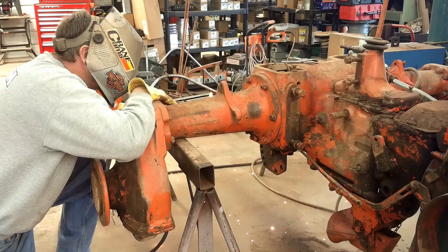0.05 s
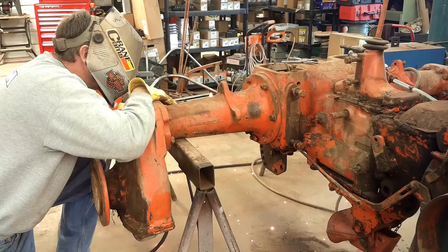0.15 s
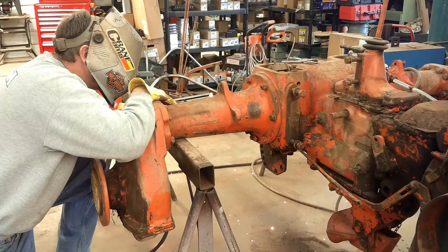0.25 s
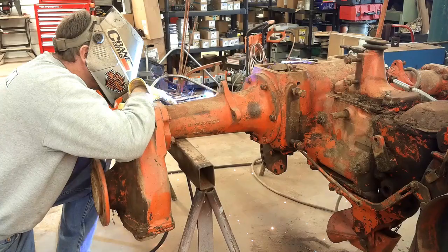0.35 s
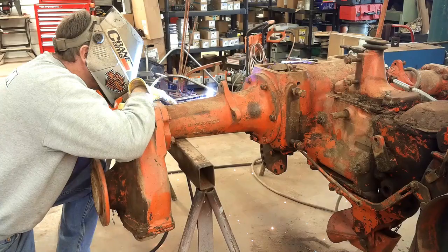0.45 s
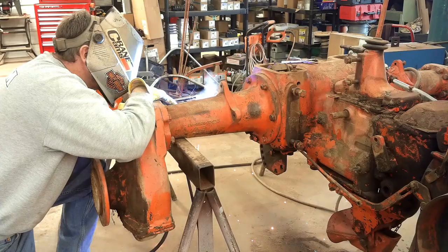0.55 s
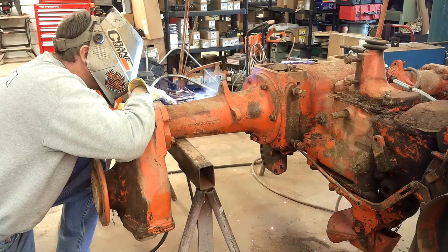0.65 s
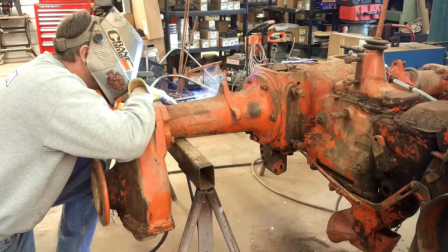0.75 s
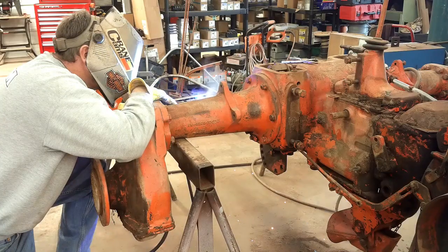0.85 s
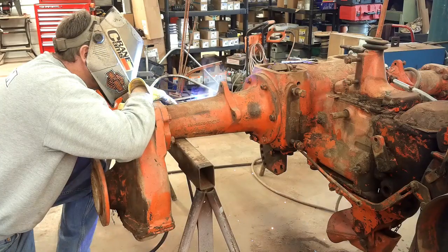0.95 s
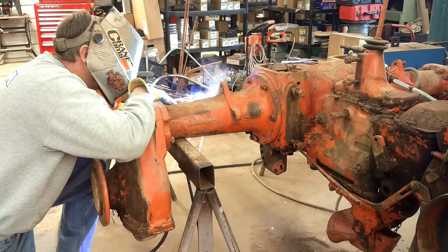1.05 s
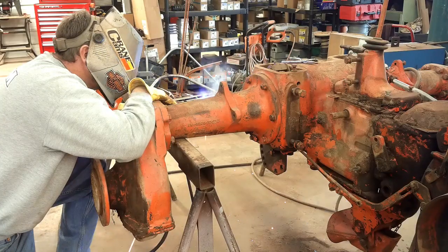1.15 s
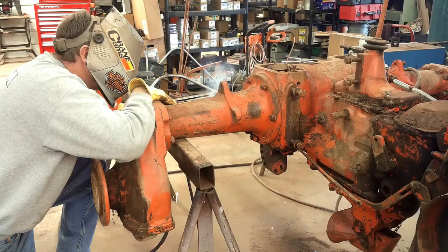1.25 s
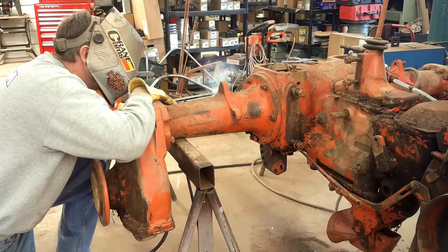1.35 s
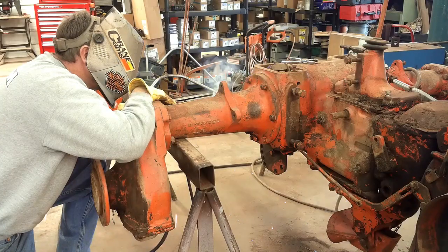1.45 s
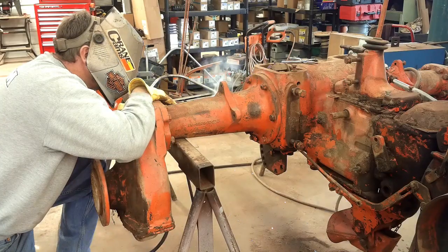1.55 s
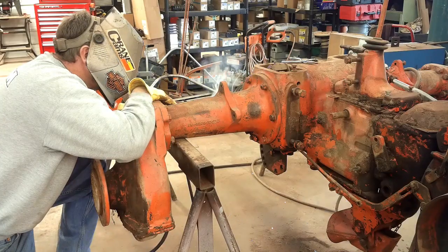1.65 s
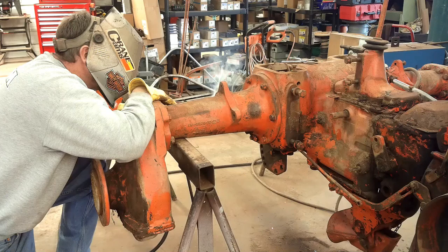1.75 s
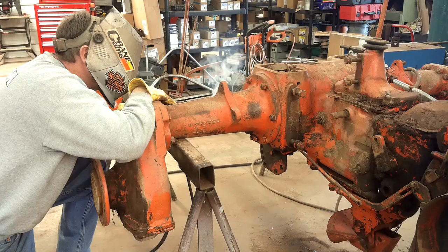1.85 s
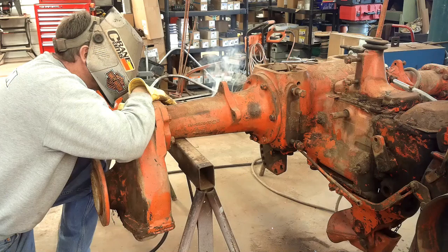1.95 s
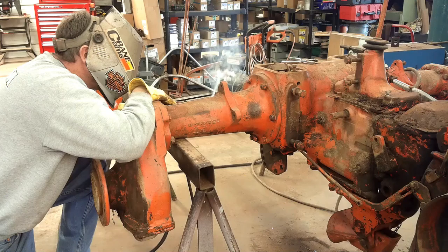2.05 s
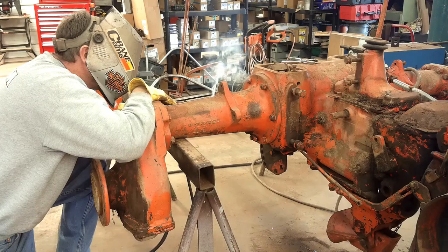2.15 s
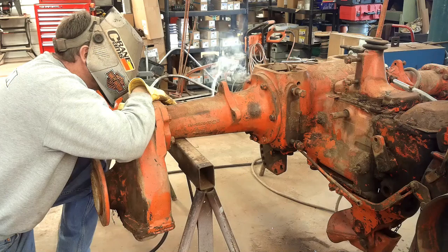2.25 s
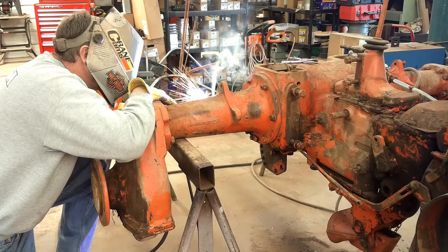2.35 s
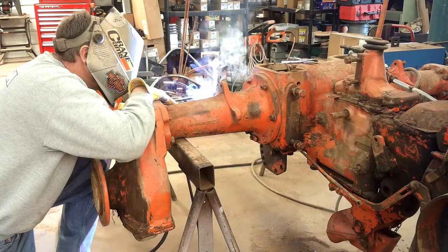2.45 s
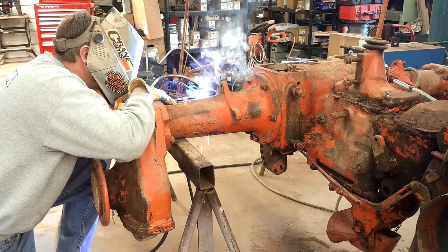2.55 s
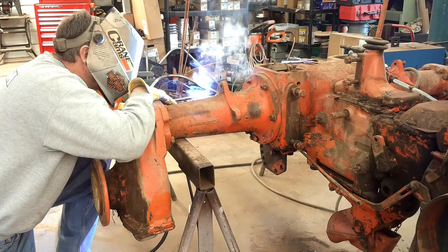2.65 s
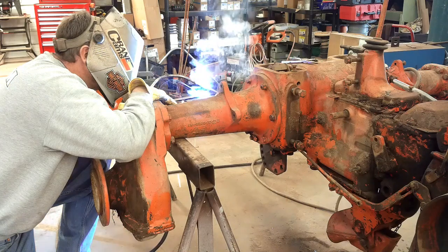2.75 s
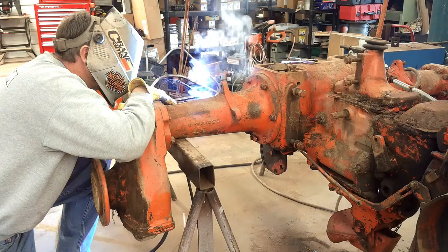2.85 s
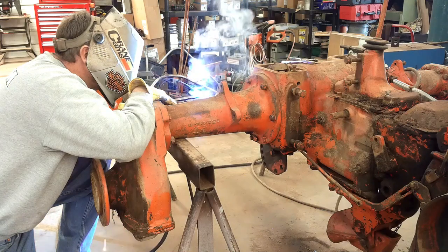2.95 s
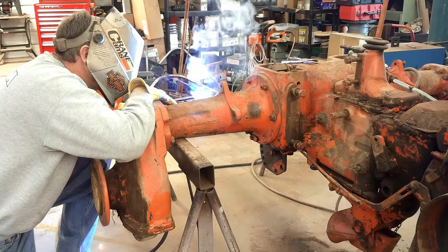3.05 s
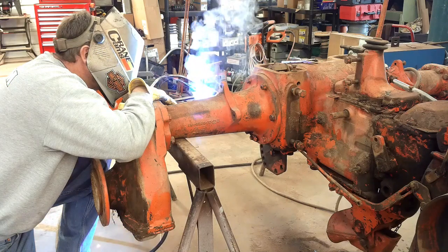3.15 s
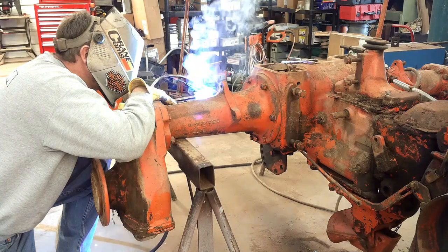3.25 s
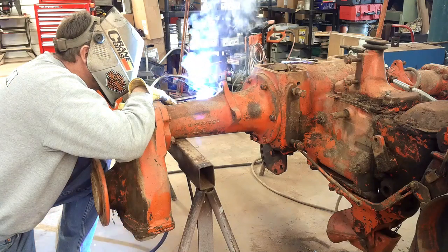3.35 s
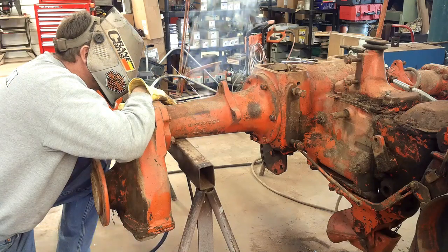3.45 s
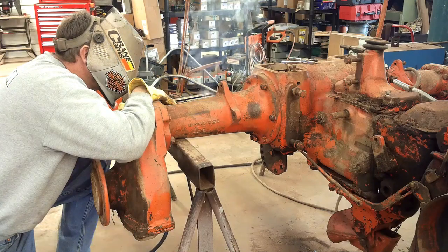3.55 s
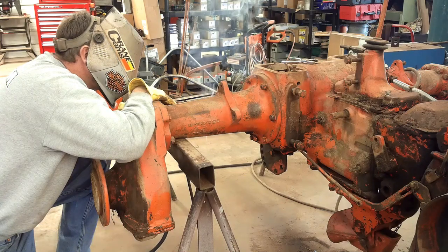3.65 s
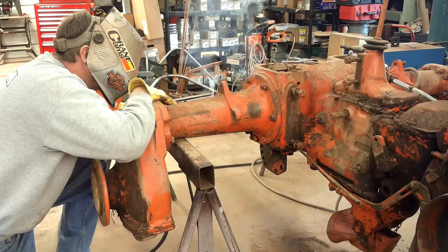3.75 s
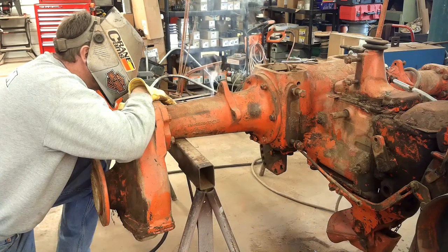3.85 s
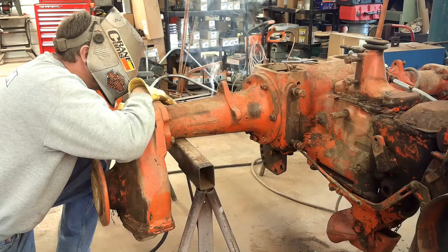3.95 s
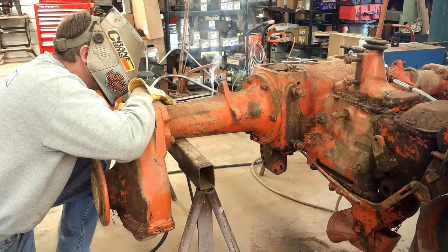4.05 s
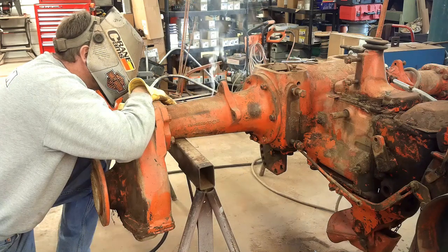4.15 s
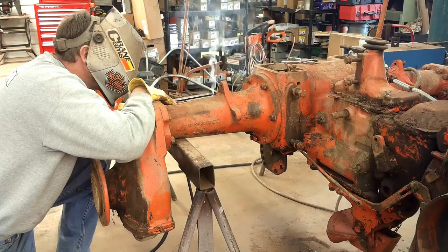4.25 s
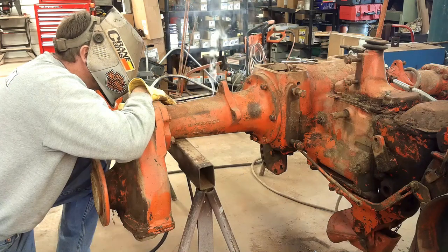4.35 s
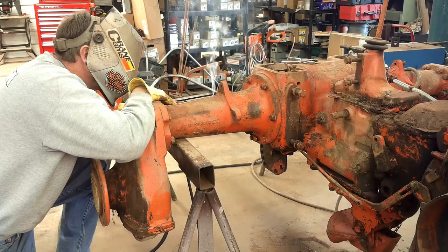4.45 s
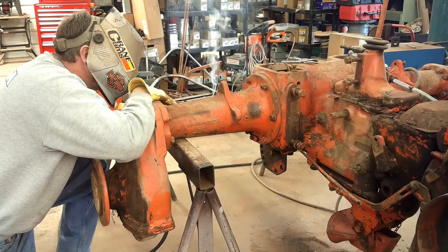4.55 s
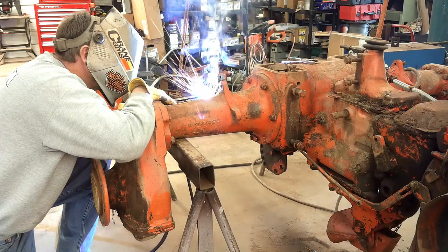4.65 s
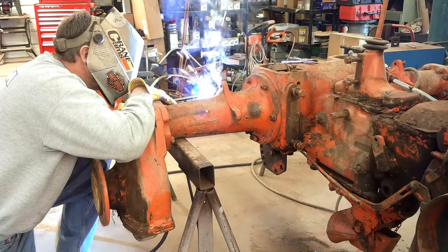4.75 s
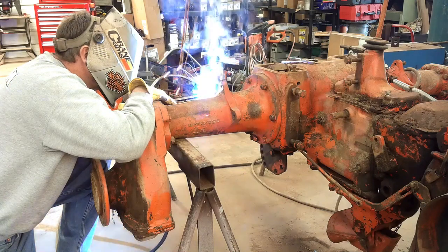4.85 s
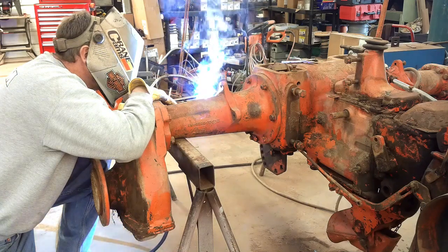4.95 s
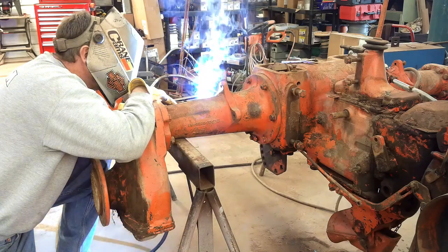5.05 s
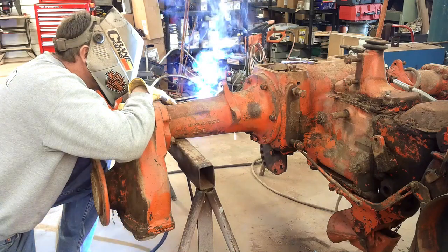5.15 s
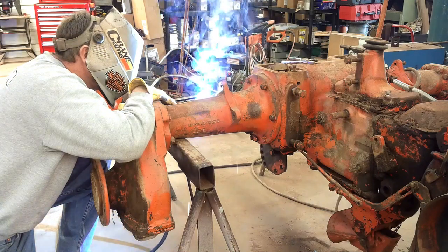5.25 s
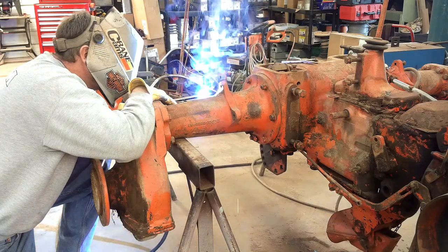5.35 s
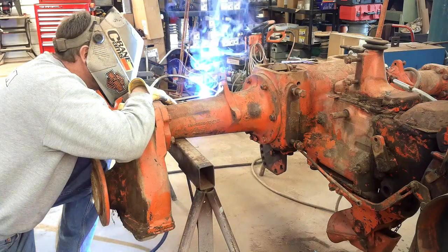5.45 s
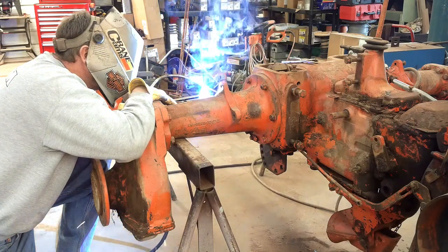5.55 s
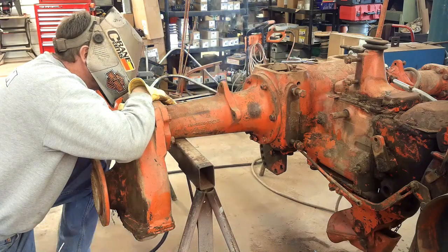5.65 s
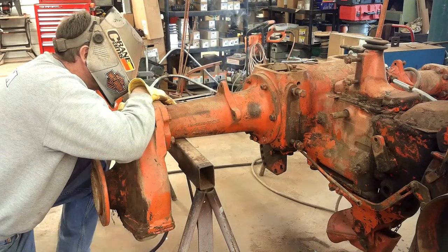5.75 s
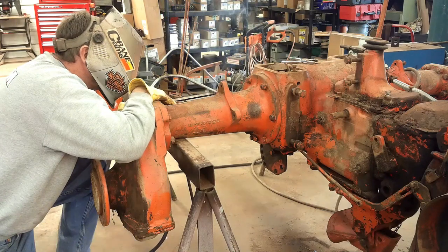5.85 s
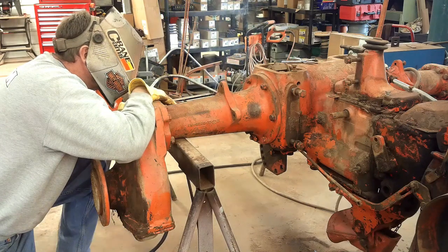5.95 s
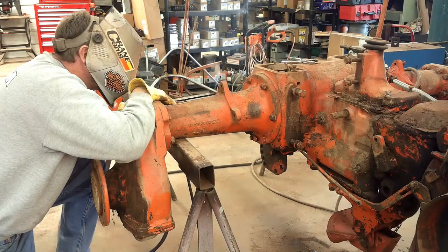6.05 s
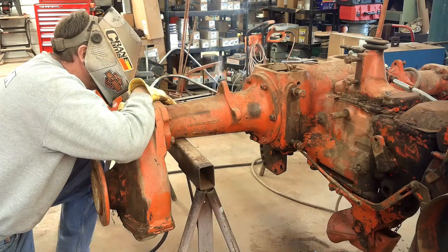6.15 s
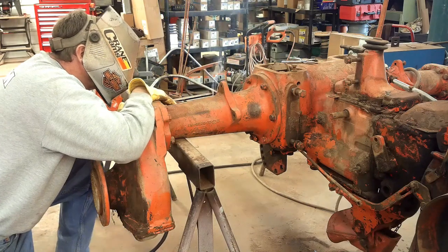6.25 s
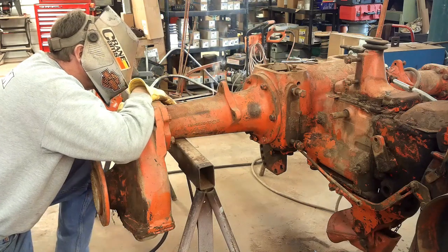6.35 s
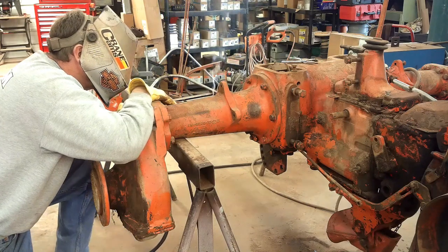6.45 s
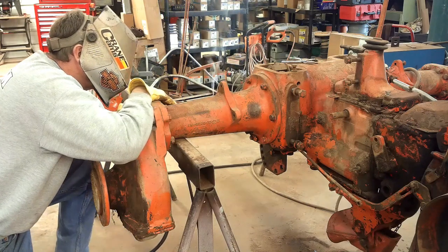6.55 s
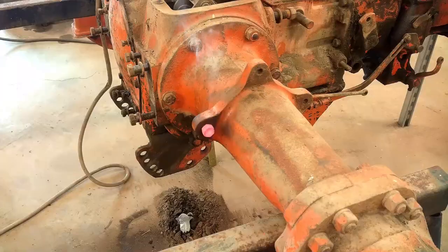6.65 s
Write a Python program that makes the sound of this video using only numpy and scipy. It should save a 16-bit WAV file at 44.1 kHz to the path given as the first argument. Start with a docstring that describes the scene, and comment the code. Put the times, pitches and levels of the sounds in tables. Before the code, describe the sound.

In a workshop, an arc welder strikes on rusty steel with a scratch and low thump, spitting coarse crackles and loud pops for nearly a second. After a pause with faint transformer hum, two more one-second welds settle into buzzing, frying sizzle with a thin whistle. Each ends in a short gas puff with metal ringing. Close microphone, hard echoes, loudest pops slightly overloaded.

```python
"""Three short arc welds

A nut is welded to a rusted bolt on a tractor axle, in a workshop. Each weld starts with a scratch and a thump
and ends with a puff of gas. The first spits on the rust; the others settle into a frying sizzle, pulsing with
the mains, and a thin whistle. Spatter and sizzle are random sparks, pops are filtered clicks, gas is shaped
noise; the steel rings as resonators, and the transformer hum, heard in between, is a set of sines."""
import sys
import numpy as np
from scipy import signal
from scipy.fft import rfft, irfft
from scipy.io import wavfile
from scipy.ndimage import uniform_filter1d

SR = 44100
rng = np.random.default_rng(int(sys.argv[2]) if len(sys.argv) > 2 else 0)


def generate_wav(sig):
    """Save sig (samples, or channels by samples) to the path in sys.argv[1] as 16-bit PCM at SR."""
    pcm = np.round(np.clip(np.atleast_2d(sig).T, -1, 1) * 32767).astype(np.int16)
    wavfile.write(sys.argv[1], SR, pcm)


N = 295602
TIME = np.arange(N) / SR
MAINS_HZ = 60


def from_db(db):
    """Decibels to gain."""
    return 10 ** (np.asarray(db) / 20)


def rms_one(x):
    """Scale to an rms of one."""
    return x / np.sqrt(np.mean(x ** 2) + 1e-20)


def at_hz(points, hz):
    """Interpolate a table on a log-frequency axis."""
    known_hz, values = np.transpose(points)
    return np.interp(np.log(hz + 1), np.log(known_hz), values)


def colour(x, spectrum):
    """Minimum-phase filter with the given spectrum shape; white noise keeps its level."""
    size = 8192
    gain = rms_one(from_db(at_hz(spectrum, np.fft.rfftfreq(size, 1 / SR))))
    # fold the cepstrum to make the response causal
    cepstrum = irfft(np.log(gain))[:size // 2]
    cepstrum[1:] *= 2
    response = irfft(np.exp(rfft(cepstrum, size)))
    return signal.fftconvolve(x, response)[:N]


def resonate(x, hz, width_hz):
    """Two-pole resonance, gain one at its top."""
    r = np.exp(-np.pi * width_hz / SR)
    zeros = np.array([1, 0, -1]) * (1 - r * r) / 2
    poles = [1, -2 * r * np.cos(2 * np.pi * hz / SR), r * r]
    return signal.lfilter(zeros, poles, x + 1e-18)


def flicker(per_s):
    """Smooth random curve, rms one."""
    return rms_one(np.interp(TIME * per_s, np.arange(N), rng.standard_normal(N)))


def sparks(per_s, spread_db):
    """Tiny discharges at random moments, a few much larger than the rest; rms one."""
    sizes = from_db(spread_db * np.minimum(rng.exponential(1, N), 4))
    signs = rng.choice([-1, 1], N)
    return rms_one(sizes * signs * (rng.random(N) < per_s / SR))


def swell(start, rise_s, t60):
    """Envelope: linear rise times exponential decay."""
    age = np.maximum(TIME - start, 0)
    return np.minimum(age / rise_s, 1) * np.exp(-np.log(1000) * age / t60)


# welds: arc lights t/s, arc out t/s, fade/s, settled crackle level/dB, extra level while fresh/dB,
# spatter share of power [0-1], lift of odd hum lines/dB
WELDS = [(0.443, 1.327, 0.12, -18.5, -2, 0.94, 0.5), (2.434, 3.508, 0.016, -25, 6.5, 0.34, 16.5),
         (4.732, 5.703, 0.015, -24.5, 6, 0.07, 13.5)]
# relative spectra of coarse spatter and fine sizzle: f/Hz, level/dB
SPATTER_SPECTRUM = [(88, -47.5), (150, -24), (225, -36), (290, -24.5), (381, -22.5), (694, -9.5),
                    (1170, -12.5), (1630, -7.5), (2650, -3.5), (3900, 0), (6340, -6.5), (9530, -4),
                    (15500, -30.5)]
SIZZLE_SPECTRUM = [(150, -25.5), (400, -14), (900, -6), (2300, -3.5), (3100, -1.5), (3900, -1),
                   (5400, -4.5), (6400, -14.5), (7900, -6), (9700, -13), (11000, -23.5), (12000, -20.5),
                   (13200, -11), (15500, -26.5)]
LIGHT_S, SETTLE_S = 0.012, 0.23   # build-up of a new arc; time to calm


def arc(pulse_depth, sharpness, clump_db):
    """Random discharges: clumped spatter, sizzle pulsed by the current; also returns the settled level."""
    # the current peaks twice per mains cycle
    current = np.abs(np.sin(2 * np.pi * MAINS_HZ * TIME)) ** sharpness
    pulsing = rms_one(1 + pulse_depth * current)
    clumped = sparks(per_s=5000, spread_db=3.5) * from_db(clump_db * flicker(per_s=260))
    spatter = colour(clumped, SPATTER_SPECTRUM)
    sizzle = colour(sparks(per_s=9000, spread_db=2.5) * pulsing, SIZZLE_SPECTRUM)
    crackle, settled = np.zeros(N), np.zeros(N)
    for start, stop, fade_s, db, fresh_db, share, _ in WELDS:
        lighting = np.clip((TIME - start) / LIGHT_S, 0, 1)
        going_out = np.clip((stop - TIME) / fade_s, 0, 1)
        fresh = np.exp(-((TIME - start) / SETTLE_S) ** 2)
        level = lighting * going_out * from_db(db + fresh_db * fresh)
        crackle += level * (np.sqrt(share) * spatter + np.sqrt(1 - share) * sizzle)
        settled += level * ((1 - share) * (1 - fresh)) ** 2
    return crackle, settled


# big bursting drops: t/s, relative level/dB, volley length/s (0 = single)
POPS = [(0.4168, -3.5, 0), (0.4476, -1.5, 0), (0.4743, -5.5, 0), (0.5113, -8, 0), (0.596, 0.5, 0.042),
        (0.6587, -1, 0.025), (0.7006, -1, 0.025), (0.7486, -2, 0), (0.7665, -2.5, 0), (0.8507, 1, 0),
        (1.0551, -9.5, 0), (1.0842, 5, 0.06), (1.2233, 1, 0), (2.4284, -15, 0), (2.463, -10, 0.025),
        (3.1504, -15, 0), (4.7291, -10, 0), (5.3349, -16, 0), (5.3953, -15, 0)]
VOLLEY_GAP_S, VOLLEY_JITTER_S, VOLLEY_LOSS_DB = 0.0165, 0.002, 2.1   # per drop of a volley
# rate in pure spatter; level re settled crackle setting, before the common burst gain
SMALL_POPS_PER_S, SMALL_POP_DB, SMALL_POP_SPREAD_DB = 24, 5, 2


def drops():
    """Rows (t/s, level/dB): big drops set off dying volleys, small ones come at random with the spatter."""
    rows = []
    for (t, db, length_s), jitter in zip(POPS, rng.standard_normal((len(POPS), 8))):
        rows.append((t, db))
        for k, chance in enumerate(jitter, 1):
            delay_s = k * VOLLEY_GAP_S
            if delay_s < length_s:
                rows.append((t + delay_s + VOLLEY_JITTER_S * chance, db - k * VOLLEY_LOSS_DB))
    for start, stop, fade_s, db, _, share, _ in WELDS:
        moments = rng.uniform(start, stop - fade_s, size=40)
        levels_db = db + SMALL_POP_DB + SMALL_POP_SPREAD_DB * rng.standard_normal(size=40)
        count = round(SMALL_POPS_PER_S * np.sqrt(share) * (stop - start))
        rows += list(zip(moments, levels_db))[:count]
    return rows


# light electrode taps: t/s, relative level/dB
TAPS = [(0.0606, -51), (0.2667, -57)]


def cracks(rows, t60, fizz):
    """Each burst or tap is one sharp pressure step plus a brief decaying fizz."""
    clicks = np.zeros(N)
    for t, db in rows:
        clicks[round(t * SR)] += from_db(db)
    decay = np.exp(-np.log(1000) / (t60 * SR))
    dying = signal.lfilter([1], [1, -decay], clicks + 1e-18)
    return colour(clicks + fizz * dying * rng.standard_normal(N), SPATTER_SPECTRUM)


# electrode scratches and first sparks: t/s, length/s, level/dB
SCRATCHES = [(0.02, 0.33, -68), (0.381, 0.05, -24), (2.408, 0.025, -28.5), (4.693, 0.029, -25.5)]
# gas swells as the arc lights, bursts or breaks: t/s, level/dB, t60/s
THUMPS = [(0.398, -26.5, 0.36), (0.65, -38, 0.27), (1.085, -28, 0.15), (2.421, -30.5, 0.52),
          (3.508, -37.5, 0.16), (4.712, -33, 0.24)]
# tip blows free with a dull bang: t/s, level/dB, t60/s
BANGS = [(4.7266, -4.5, 0.034)]
# relative spectra of scratch, thump, and gas rush or bang: f/Hz, level/dB
SCRATCH_SPECTRUM = [(150, -14.5), (600, -9.5), (1400, -14), (3000, -10.5), (4700, -1.5), (6500, -15),
                    (8500, -24), (11000, -41)]
THUMP_SPECTRUM = [(50, -32.5), (110, -23.5), (170, -2.5), (230, -15), (290, 5), (420, -13), (800, -28)]
PUFF_SPECTRUM = [(71, -60), (120, -18.5), (283, -11.5), (456, -9), (602, -3.5), (845, -9), (1010, -5.5),
                 (1450, -4.5), (2580, 0.5), (3610, -0.5), (4410, 1), (5380, -7), (14000, -49)]


def strikes():
    """Growing sparks as the tip scratches, low thumps of gas, and a bang where the tip has stuck."""
    contact, push, blast = np.zeros(N), np.zeros(N), np.zeros(N)
    for t, length_s, db in SCRATCHES:
        growth = np.sqrt(np.clip((TIME - t) / length_s, 0, 1))
        contact += from_db(db) * growth * (TIME < t + length_s)
    for t, db, t60 in THUMPS:
        push += from_db(db) * swell(t, rise_s=0.005, t60=t60)
    for t, db, t60 in BANGS:
        blast += from_db(db) * swell(t, rise_s=0.00076, t60=t60)
    scratch = contact * colour(sparks(per_s=1500, spread_db=1.5), SCRATCH_SPECTRUM)
    thump = push * colour(rng.standard_normal(N), THUMP_SPECTRUM)
    bang = blast * colour(rng.standard_normal(N), PUFF_SPECTRUM)
    return scratch + thump + bang


# arc stretches and blows out: t/s, level/dB, length/s, flare re puff/dB, steel ring re puff/dB
PUFFS = [(1.268, -19.5, 0.15, -6, -39), (3.503, -22, 0.11, 3.5, -5), (5.701, -23.5, 0.12, 12, -10)]
# resonances in the gas rush: f/Hz, width/Hz, gain/dB
PUFF_RINGS = [(2390, 47, -6.5), (3620, 130, 2), (4280, 180, -7.5)]
PUFF_RING_HZ, PUFF_RING_WIDTH_HZ = 955, 64


def blowouts():
    """The breaking arc flares; a rush of gas lingers, then closes off, and the steel rings."""
    rush = colour(sparks(per_s=7600, spread_db=2.0), PUFF_SPECTRUM)
    ringing = sum(from_db(db) * resonate(rush, hz, width_hz) for hz, width_hz, db in PUFF_RINGS)
    rush = rms_one(rush + ringing)
    steel_ring = rms_one(resonate(rng.standard_normal(N), PUFF_RING_HZ, PUFF_RING_WIDTH_HZ))
    out = np.zeros(N)
    for t, db, length_s, flare_db, ring_db in PUFFS:
        lingering = (TIME > t) * np.exp(-((TIME - t) / length_s) ** 2)
        flare = from_db(flare_db) * swell(t, rise_s=0.014, t60=0.12)
        out += from_db(db) * rush * (lingering + flare)
        out += from_db(db + ring_db) * steel_ring * swell(t + 0.048, rise_s=0.013, t60=0.37)
    return out


# steel parts around the arc: f/Hz, width/Hz, relative gain/dB
STEEL = [(1355, 9.4, -3), (2343, 33, 6), (2834, 12, 3), (3083, 14, -5), (3160, 11, 0), (3390, 36, 0),
         (3430, 23, -3.5), (3744, 52, 3.5), (3760, 21, 1.5), (3897, 26, 2.5), (3956, 15, 1.5),
         (4115, 18, 0.5), (4090, 8.7, -1.5), (4160, 9.3, 0.5), (4850, 14, -2), (5040, 20, 4),
         (5270, 12, 0.5), (5670, 35, 4.5), (9900, 110, -5.5)]


def steel_parts(weld):
    """Parallel modes of the steel, driven by the welding sounds."""
    return sum(from_db(db) * resonate(weld, hz, width_hz) for hz, width_hz, db in STEEL)


WHISTLE_HZ, WHISTLE_STAGE_WIDTH_HZ, WHISTLE_DB = 1367, 14, -6.5   # gain re settled-arc level


def whistle(settled):
    """A settled arc sings a thin, unsteady tone: noise through two narrow resonances."""
    once = resonate(rng.standard_normal(N), WHISTLE_HZ, WHISTLE_STAGE_WIDTH_HZ)
    tone = rms_one(resonate(once, WHISTLE_HZ, WHISTLE_STAGE_WIDTH_HZ))
    strength = np.minimum(settled, from_db(-34.5))
    return from_db(WHISTLE_DB) * uniform_filter1d(strength, size=4000) * tone


# hum lines, lowest two beating: f/Hz, level before core shift/dB
HUM = [(351.5, -76), (360.7, -71), (538.3, -70), (576.0, -76.5), (662.1, -76), (780.6, -69.5), (899.0, -75),
       (958.2, -84.5), (1017, -87), (1502, -82.5), (2040, -84.5), (2401, -85), (2460, -87)]
CORE_REST_DB, CORE_RELAX_S = -10, 1.5   # idle shift of odd lines; relaxation time constant


def transformer():
    """Wavering hum lines; welds magnetise the core, lifting those nearest odd mains harmonics for a while."""
    core_db = np.full(N, CORE_REST_DB)
    for start, stop, *_, lift_db in WELDS:
        relaxing = np.exp(-np.maximum(TIME - stop, 0) / CORE_RELAX_S)
        core_db = np.where(TIME > start, CORE_REST_DB + lift_db * relaxing, core_db)
    out = np.zeros(N)
    for hz, db in HUM:
        odd = round(hz / MAINS_HZ) % 2
        level = from_db(db + odd * core_db + 0.7 * flicker(per_s=8.2))
        out += np.sqrt(2) * level * np.sin(2 * np.pi * (hz * TIME + rng.random()))
    return out


# echoes from casting and floor: delay/s, gain re direct
ECHOES = [(0.00313, 0.49), (0.0038, 0.066), (0.007, 0.4), (0.0111, 0.22), (0.0147, 0.25)]
# workshop decay: f/Hz, t60/s
SHOP_T60 = [(200, 0.59), (1000, 0.44), (4000, 0.4), (9000, 0.4), (15000, 0.34)]


def workshop(x, wet_db, build_s):
    """Direct sound, hard echoes and a diffuse tail whose treble dies first; unit-energy response."""
    age = TIME[:SR]
    edges = np.geomspace(40, 18000, num=13)
    response = np.zeros(SR)
    for low, high in zip(edges, edges[1:]):
        sos = signal.butter(2, [low, high], "band", fs=SR, output="sos")
        band = signal.sosfilt(sos, rng.standard_normal(SR))
        response += band * np.exp(-np.log(1000) * age / at_hz(SHOP_T60, np.sqrt(low * high)))
    response *= 1 - np.exp(-age / build_s)
    response *= from_db(wet_db) / np.linalg.norm(response)
    response[0] += 1   # direct
    for delay_s, gain in ECHOES:
        response[round(delay_s * SR)] += gain
    return signal.fftconvolve(x, response / np.linalg.norm(response))[:N]


# relative spectrum of the shop air: f/Hz, level/dB
SHOP_AIR_SPECTRUM = [(12, -37.5), (20, -0.5), (238, -6), (314, -10), (361, -10.5), (505, -11), (549, -11),
                     (766, -15.5), (833, -17.5), (905, -18), (1820, -22.5), (2400, -22), (15500, -29.5)]
AIR_DB = -60.5


def shop_air():
    """Steady background: coloured noise."""
    return from_db(AIR_DB) * colour(rng.standard_normal(N), SHOP_AIR_SPECTRUM)


def scene():
    """Crackle, bursts, strikes and puffs excite steel and room; both channels are alike."""
    crackle, settled = arc(pulse_depth=2.3, sharpness=12.0, clump_db=3.0)
    bursts = from_db(17.5) * cracks(drops() + TAPS, t60=0.0075, fizz=0.27)
    weld = crackle + bursts + strikes() + blowouts()
    steel = from_db(-2.5) * steel_parts(weld)
    room = from_db(-1.5) * workshop(weld, wet_db=0.0, build_s=0.013)
    mono = room + steel + whistle(settled) + transformer() + shop_air()
    return np.stack([mono, mono])


CUTOFF_HZ = 15600


def record(dry):
    """The loudest pops overload the microphone (soft clipping); a low-pass cuts the top."""
    ceiling = 0.82
    clipped = dry / (1 + (dry / ceiling) ** 6) ** (1 / 6)
    return signal.sosfilt(signal.ellip(10, 0.1, 80, CUTOFF_HZ, fs=SR, output="sos"), clipped)


dry = scene()
out = record(dry)
generate_wav(out)
```